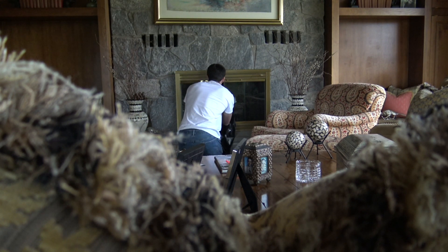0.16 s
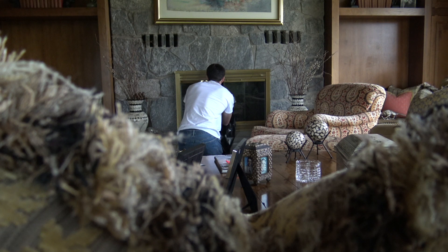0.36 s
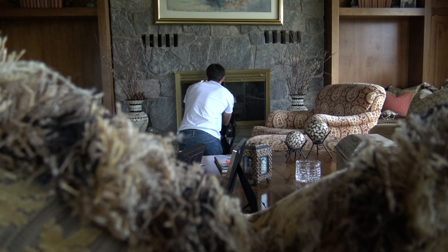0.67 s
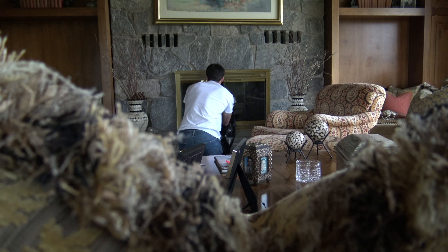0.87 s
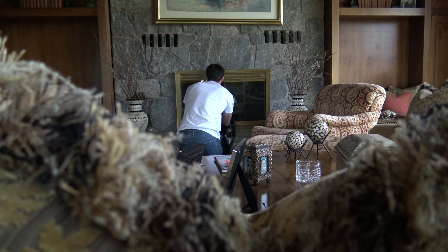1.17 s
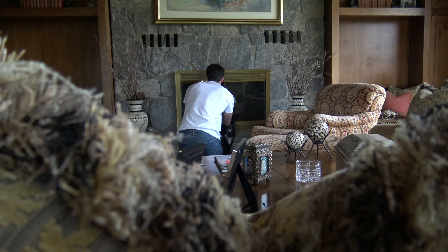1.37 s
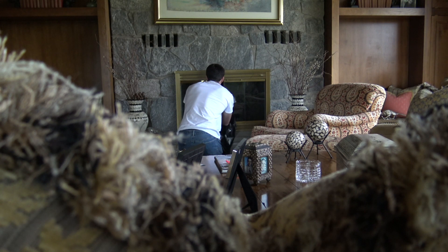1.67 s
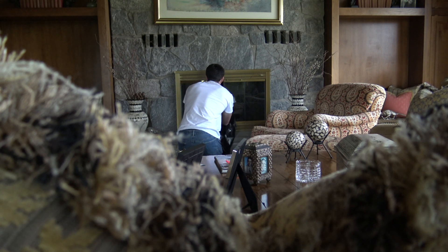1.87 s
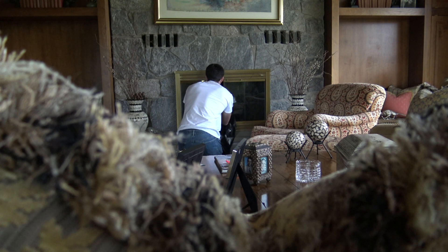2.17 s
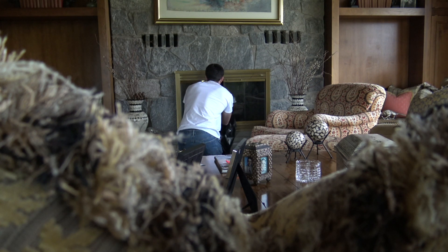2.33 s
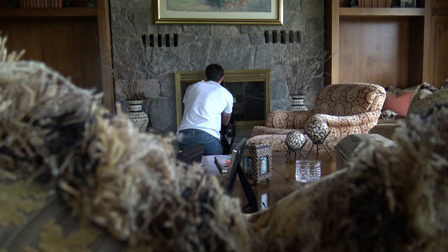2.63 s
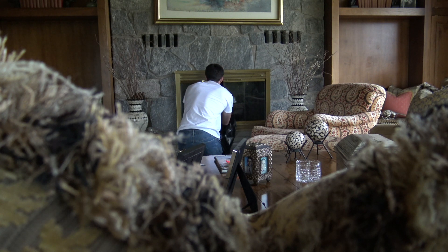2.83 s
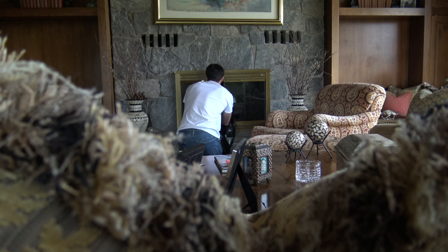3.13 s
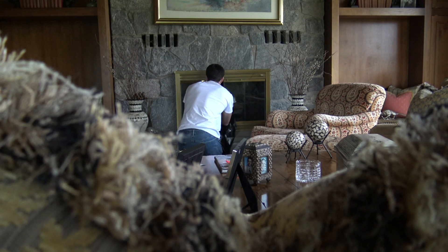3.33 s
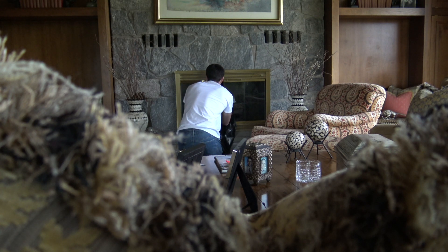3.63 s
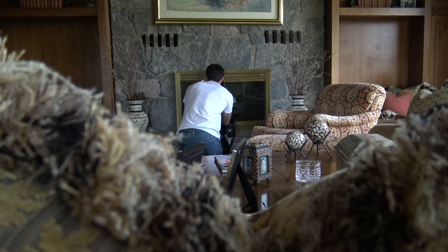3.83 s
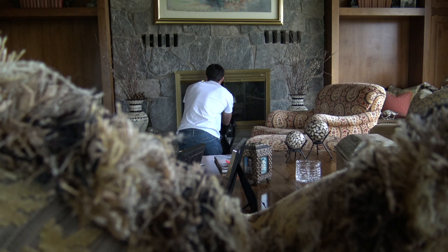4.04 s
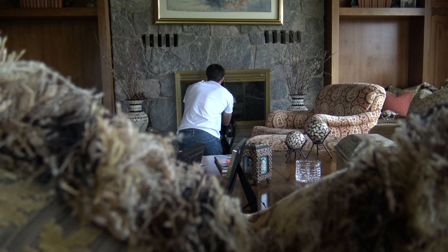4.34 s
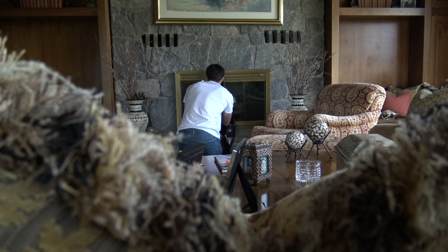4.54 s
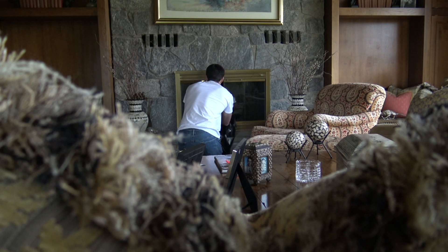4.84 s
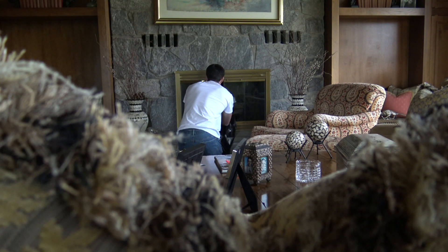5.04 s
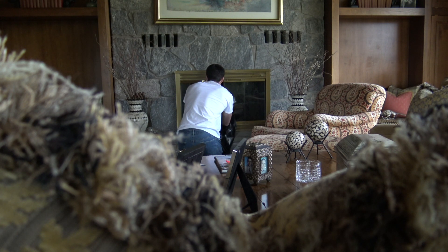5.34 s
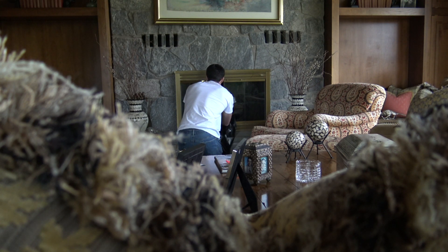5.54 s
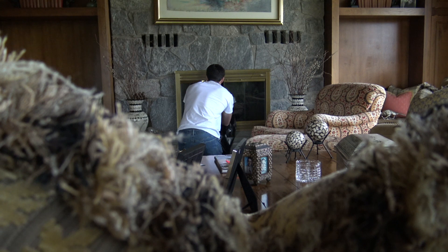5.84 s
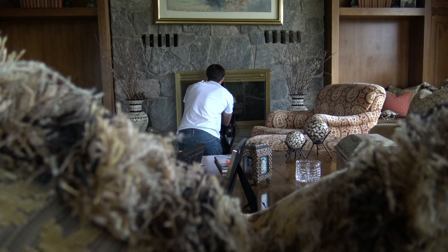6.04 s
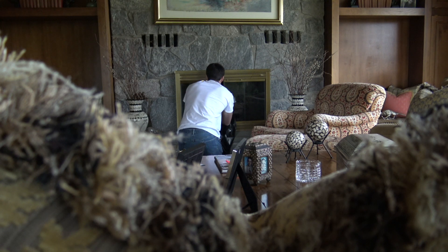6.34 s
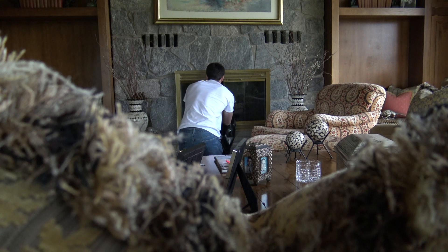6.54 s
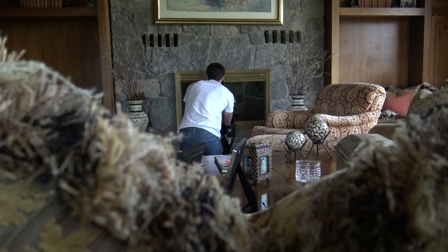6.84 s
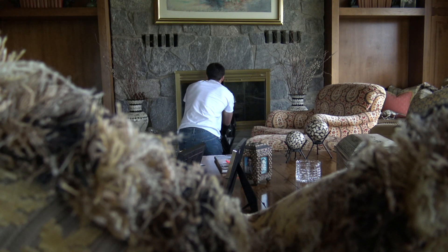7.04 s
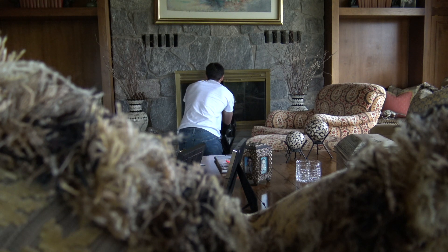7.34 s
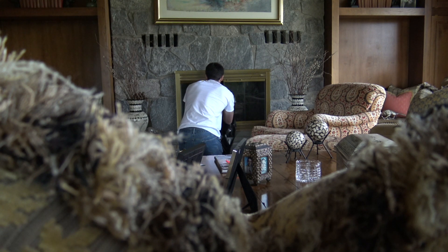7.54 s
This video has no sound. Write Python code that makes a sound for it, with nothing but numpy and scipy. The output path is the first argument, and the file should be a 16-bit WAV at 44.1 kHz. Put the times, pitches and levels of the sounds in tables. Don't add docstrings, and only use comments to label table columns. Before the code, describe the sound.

A hand shakes the metal-framed glass doors of a stone fireplace, heard from across a living room. Uneven slams, bounces and rattles fill four seconds, with hollow booms, panel clangs and sharp pane snaps. Then near silence over faint fan hum and hiss, a soft knock with a light brush past six seconds, and another small double knock near the end.

```python
import sys
import numpy as np
from scipy import signal
from scipy.fft import rfft, irfft, next_fast_len
from scipy.io import wavfile
from scipy.ndimage import uniform_filter1d

SR = 44100
rng = np.random.default_rng(int(sys.argv[2]) if len(sys.argv) > 2 else 0)


def voltage_ratio(decibels):
    exponent = np.asarray(decibels, float) / 20
    return 10 ** exponent


def digitize_waveform(pressure):
    field = np.atleast_2d(pressure).T
    bounded = np.clip(field, -1, 1)
    quanta = np.round(bounded * 32767).astype(np.int16)
    wavfile.write(sys.argv[1], SR, quanta)


N = 339570
STEP = 15


def unit(x):
    return x / np.sqrt(np.mean(x ** 2) + 1e-20)


def along(points, hz):
    f, value = np.transpose(points)
    return np.interp(np.log(hz + 1), np.log(f + 1), value)


def filtered(x, response):
    m = 2 * next_fast_len(N // 2 + SR // 4)
    return irfft(rfft(x, m) * response(np.fft.rfftfreq(m, 1 / SR)), m)[..., :N]


def causal(gain):
    cepstrum = irfft(np.log(np.maximum(gain, 1e-6)))
    half = len(cepstrum) // 2
    cepstrum[1:half] *= 2
    cepstrum[half + 1:] = 0
    return np.exp(rfft(cepstrum))


# frequency in Hz, level in dB per Hz.
HUM = [(20, -8), (45, -3.5), (90, -4.5), (200, -7), (400, -12.5), (620, -20), (800, -15.5), (920, -11.5),
       (1150, -13.5), (1400, -23), (2200, -27), (6000, -28), (12000, -30.5), (15800, -33)]


def hum():
    z = signal.stft(rng.standard_normal((2, N)), nperseg=512)[2]
    patches = uniform_filter1d(rng.standard_normal(z.shape[1:]), size=4, axis=0)
    patches = uniform_filter1d(patches, size=10, axis=1)
    z = z * voltage_ratio(1.2 * unit(patches))
    pair = signal.istft(z, nperseg=512)[1][:, :N]
    return voltage_ratio(-57.5) * unit(filtered(pair, lambda hz: voltage_ratio(along(HUM, hz))))


# start in seconds, strength in dB, extra weight in dB, extra hardness in dB, pane snap pitch in Hz.
SLAMS = [(0.181, -25, .3, -7, 1680), (0.433, -21, -5, -2.5, 2080), (1.2143, -27, -2.5, 3.5, 2080),
         (1.4828, -22, .3, -1.5, 2960), (1.705, -29, 3, -3.5, 2850), (1.9164, -28, .3, 6.5, 1420),
         (2.248, -36, 3.5, -1.5, 3300), (2.9526, -28, .3, -.3, 3390), (3.1625, -28, 5, 6, 1430),
         (3.3795, -23, 3, .3, 3070), (3.5976, -22, -1.5, .3, 2020), (3.817, -24, 4.5, .7, 3380),
         (4.03, -30, 5.5, -1.5, 3400), (6.321, -42, 3, .3, 3200), (7.3025, -33.5, -.3, -14, 1460),
         (7.3965, -41, 5, -.7, 1540)]
# start in seconds, strength in dB, extra weight in dB, extra hardness in dB if any.
PUSHES = [
    (0.161, -35, 8),
    (0.415, -27, 2.5),
    (1.465, -30, 5),
    (1.695, -24, -9, -4),
    (2.93, -45, 9),
    (3.149, -21.5, -6, -4),
    (3.58, -28, 5),
    (4.02, -28, 4, 10.5),
]
# start in seconds, strength in dB, extra weight in dB, extra hardness in dB.
REBOUNDS = [
    (0.46, -27, -2.5, .3),
    (1.245, -24, -1.5, .3),
    (1.515, -31, -.3, 4),
    (1.94, -23.5, 1.5, -5),
    (2.98, -36, 6, .3),
    (3.62, -33, 8, 4),
    (6.35, -48, 8, 2.5),
    (1.74, -31, 4, .3),
]
# start in seconds, strength in dB, extra weight in dB, extra hardness in dB.
SWINGS = [(-0.04, -29, .3, -.3), (0.7, -47, 2.5, -5), (2.05, -35, -15, -19), (2.36, -46, 5, -6),
          (3.1, -32, -4, -6), (3.3, -32, .3, 3), (3.48, -36, -9, 3), (3.745, -35, 2.5, 2.5),
          (3.93, -34, .7, 2.5), (4.08, -39, -15, -19), (4.31, -52, 1.5, -.3), (4.52, -56, 8, -9),
          (6.41, -53, 4, 5), (7.44, -49, 5, 4)]
# start in seconds, strength in dB, extra weight and extra hardness in dB if any.
BAR_RATTLES = [
    (0.315, -30, -2.5, 2.5),
    (0.59, -36.5, -6, -4),
    (1.35, -37),
    (1.39, -33),
    (1.6, -28),
    (1.62, -33),
    (1.84, -30, -.3, 4),
]
# start in seconds, strength in dB.
BRUSHES = [
    (1.165, -67),
    (1.19, -69),
    (2.885, -67),
    (6.22, -74),
    (6.27, -72),
    (6.48, -64),
    (7.6, -70),
]
# frame, panel, pane, firebox, thump, hollow, bar and glass, all in dB.
SLAM_WAKES = (-8, -8.3, -11, -10.3, -4, -.4, -8, -7.5)
PUSH_WAKES = (-25, -15.5, -25, -9, -11, -.1, -23, -28)
REBOUND_WAKES = (-10.5, -11, -12, -10.5, -3, -.1, -10.5, -16)
SWING_WAKES = (-15, -14, -17, -6.5, -1.5, -.1, -21, -25)
RATTLE_WAKES = (-18, -16, -19.5, -10.5, -5, .6, -6, -20.5)
BRUSH_WAKES = (-4, -3, 1.5, 9, .1, -2.5, -19, -16)
FEELS_WEIGHT = (0, 0, 0, 1, 1, 0, 0, 0)
FEELS_HARDNESS = (1, .55, .95, 0, 0, 0, .7, .95)
FEELS_FORCE = (0, -.04, .17, 0, 0, 0, 0, .3)


def contacts():
    kinds = [(SLAMS, SLAM_WAKES), (PUSHES, PUSH_WAKES), (REBOUNDS, REBOUND_WAKES), (SWINGS, SWING_WAKES),
             (BAR_RATTLES, RATTLE_WAKES), (BRUSHES, BRUSH_WAKES)]
    usual_db = -25
    times, levels = [], []
    for table, wakes in kinds:
        for row in table:
            start, db, weight, hard = (*row, 0, 0)[:4]
            touch = weight * np.array(FEELS_WEIGHT) + hard * np.array(FEELS_HARDNESS)
            force = (db - usual_db) * np.array(FEELS_FORCE)
            times.append(start)
            levels.append(db + np.array(wakes) + touch + force)
    return np.array(times), np.transpose(levels)


def chatter(count, depth_db):
    knots = rng.standard_normal((count, 1000))
    t = np.arange(SR // STEP) * STEP / SR
    return [np.interp(t * 400, np.arange(len(k)), voltage_ratio(depth_db * k)) for k in knots]


# delay in seconds, level in dB, spread in seconds.
ECHOES = [
    (.008, -3, .007),
    (.021, -4, .015),
    (.045, -6, .03),
]


def part(times, level_db, shape, chatter, response):
    db, rise, first, room, room_db = shape
    t = np.arange(SR // STEP) * STEP / SR
    returns = 1 + sum(voltage_ratio(g) * (t > d) * np.exp(-np.abs(t - d) / w) for d, g, w in ECHOES)
    start = ((1 - np.exp(-t / rise)) * returns) ** 2
    burst = voltage_ratio(-60 * t / first) ** 2
    tail = voltage_ratio(room_db) ** 2 * np.exp(-2 * np.log(1000) * t / room)
    lead = 200
    power = np.zeros(lead + N // STEP + 1 + len(t))
    for s, level, grain in zip(times, level_db, chatter):
        at = lead + round(s * SR / STEP)
        power[at:][:len(t)] += voltage_ratio(level + db) ** 2 * start * (burst * grain + tail)
    envelope = np.repeat(np.sqrt(power[lead:]), STEP)[:N]
    return filtered(envelope * rng.standard_normal((2, N)), response)


# frequency in Hz, width in Hz, level in dB over the broad colour.
MODES_OF_DOOR = [(37, 12, 9), (124, 11, 9), (215, 20, 1.5), (266, 14, 7), (346, 30, 6), (927, 16, 8),
                 (1570, 30, 4), (2686, 30, 5.5), (3016, 23, 4.5), (3233, 45, 3.5), (3384, 25, 5),
                 (4500, 110, 1.5), (5440, 150, 2.5), (6340, 40, 3)]
# frequency in Hz, level in dB per Hz.
COLOUR = [(22, -14), (60, -7), (160, -7), (300, -2), (465, -7), (600, -4), (820, -6.3), (1200, -5.3),
          (2000, -5.5), (3300, -6.5), (4500, -10), (7000, -12.5), (10500, -16.5), (15800, -31)]


def door(low_hz, high_hz, share_db=0):
    f = np.fft.rfftfreq(2 ** 15, 1 / SR)
    peaks = sum(voltage_ratio(db) ** 2 / (1 + (2 * (f - c) / w) ** 2) for c, w, db in MODES_OF_DOOR)
    edges = 1 / (1 + (low_hz / (f + 1)) ** 8) / (1 + (f / high_hz) ** 8)
    gain = unit(voltage_ratio(along(COLOUR, f)) * np.sqrt((1 + peaks) * edges))
    ring = irfft(causal(gain * voltage_ratio(share_db)))
    return lambda hz: rfft(ring, 2 * (len(hz) - 1))


def ringing(modes):
    def response(f):
        r = sum((-1) ** k * voltage_ratio(db) * 1j * f * w / (c * c - f * f + 1j * f * w)
                for k, (c, w, db) in enumerate(modes))
        return r / np.sqrt(np.mean(np.abs(r) ** 2))
    return response


def struck(times, level_db, modes, blow_db):
    blows = np.zeros(N)
    late = times > 0
    blows[np.round(times[late] * SR).astype(int)] = voltage_ratio(level_db[late] + blow_db)
    return np.array([filtered(blows, ringing(modes)), np.zeros(N)])


TAP_HZ = (1436, 2020, 2686, 3016, 3233, 3384)
SNAP_S = .008


def taps(frame_db, count):
    run_s, over_frame_db, fade_db_per_s = .09, 13, 110
    draws = rng.random((len(SLAMS), count, 3))
    out = []
    for row, db, run in zip(SLAMS, frame_db, draws):
        for late, soft, which in run:
            delay = run_s * late
            peak_db = db + over_frame_db - fade_db_per_s * delay - 8 * soft
            out.append((row[0] + SNAP_S + delay, peak_db, TAP_HZ[int(which * len(TAP_HZ))]))
    return out


# start in seconds, peak level in dB, pitch in Hz.
CLACKS = [(0.2434, -21, 1570), (0.3292, -24, 1460), (0.4364, -14, 2780), (0.4874, -12, 2240),
          (1.2491, -12, 2790), (1.2634, -10.5, 2140), (1.2874, -16, 1440), (1.4974, -8, 2080),
          (1.6227, -18, 1450), (1.8402, -22, 1450), (2.9534, -18, 3450), (3.3803, -14, 3200),
          (3.396, -7, 2020), (1.52, -16, 1440), (3.5234, -22, 3500), (3.8182, -11, 3190),
          (4.0362, -14, 1420), (7.6, -47, 6300), (7.615, -50, 6300), (6.4792, -36, 3520)]


def clacks():
    out, t = np.zeros(N + SR), np.arange(SR // 20) / SR
    frame_db = contacts()[1][0]
    slam_snaps = [(row[0] + SNAP_S, db + 22, row[-1]) for row, db in zip(SLAMS, frame_db)]
    snaps = slam_snaps + list(CLACKS) + taps(frame_db, count=6)
    draws = rng.standard_normal((len(snaps), 2))
    for (s, db, hz), spread in zip(snaps, draws):
        neighbours = sum(np.sin(2 * np.pi * hz * ratio * t) for ratio in np.exp(.25 * spread))
        ring = np.sin(2 * np.pi * hz * t) + .6 * neighbours
        crack = 1.6 * voltage_ratio(-60 * t / .01) * uniform_filter1d(rng.standard_normal(len(t)), size=4)
        snap = (ring * voltage_ratio(-60 * t / .04) + crack) * (1 - np.exp(-t / .0005))
        out[round(s * SR):][:len(t)] += voltage_ratio(db - 8.5) * snap
    return np.array([out[:N], np.zeros(N)])


# frequency in Hz, width in Hz, level in dB.
HOLLOW_MODES = [(515, 18, -1.5), (540, 16, -3.5), (575, 16, .3), (612, 18, -3), (717, 11, -5.5),
                (740, 16, -11)]
BAR_MODES = [(1436, 14, .3), (1458, 22, -5), (1530, 35, -6)]
GLASS_MODES = [(2020, 22, .3), (2060, 40, -6)]
# level in dB, rise in seconds, first t60 in seconds, room t60 in seconds, room in dB over first.
THUMP = (-1.5, .004, .15, .9, -5)
HOLLOW = (-1.9, .0015, .12, .72, -5.3)
BAR = (-2.5, .0015, .12, .72, -3.5)
GLASS = (-3.5, .0015, .12, .72, -6)


def rings():
    s, (*_, thump_db, hollow_db, bar_db, glass_db) = contacts()
    grain = chatter(count=len(s), depth_db=5)
    parts = [(thump_db, THUMP, door(210, 450)), (hollow_db, HOLLOW, ringing(HOLLOW_MODES)),
             (bar_db, BAR, ringing(BAR_MODES)), (glass_db, GLASS, ringing(GLASS_MODES))]
    shaken = sum(part(s, db, shape, grain, colour) for db, shape, colour in parts)
    hollow = struck(s, hollow_db, HOLLOW_MODES, blow_db=26)
    bar = struck(s, bar_db, BAR_MODES, blow_db=28)
    glass = struck(s, glass_db, GLASS_MODES, blow_db=25)
    return shaken + hollow + bar + glass


# level in dB, rise in seconds, first t60 in seconds, room t60 in seconds, room in dB over first.
FRAME = (-.6, .001, .15, .72, 5)
PANEL = (4, .004, .15, 0.88, .3)
PANE = (.7, .002, .15, .82, 5.5)
SIZZLE = (.9, .003, .15, .7, 6)
FIREBOX = (1.3, .022, .15, 1.2, -5.5)


def knocks():
    s, (frame_db, panel_db, pane_db, box_db, *_) = contacts()
    grain = chatter(count=len(s), depth_db=8)
    parts = [(frame_db, FRAME, door(2150, 4200)), (panel_db, PANEL, door(450, 2150)),
             (pane_db, PANE, door(4200, 9500, share_db=-.8)),
             (pane_db, SIZZLE, door(9500, 19000, share_db=-8)), (box_db, FIREBOX, door(18, 210))]
    return sum(part(s, db, shape, grain, colour) for db, shape, colour in parts)


def ports(pair, lean, apart):
    left, right = filtered(pair[0], lambda hz: voltage_ratio(np.outer([.5, -.5], along(lean, hz))))
    side = filtered(pair[1], lambda hz: voltage_ratio(along(apart, hz)))
    return np.array([left + side, right - side])


# frequency in Hz, left over right in dB.
LEAN = [(60, 0.5), (99, 0.5), (160, 2), (270, 1.0), (450, -0.5), (740, -1.5), (1220, -3), (2010, -1.5),
        (3330, -0.5), (5500, 0.0), (9080, 0.0), (15000, 0.0)]
HUM_LEAN = [(60, -0.5), (180, 2.5), (550, -0.5), (1650, -3.5), (4970, 0.0), (15000, 0.0)]
# frequency in Hz, level in dB.
APART = [(30, -27), (250, -21), (1200, -18), (2500, -28), (4000, -28), (14000, -25)]
HISS_APART = [(30, -22), (250, -16), (1000, -14), (2000, -30), (4600, -30), (5500, -7), (9000, -10.5),
              (11000, -15), (13000, -28)]


def scene():
    background = ports(hum(), HUM_LEAN, HISS_APART)
    return background + ports(knocks() + rings() + clacks(), LEAN, APART)


def roll_off(x):
    return signal.sosfilt(signal.butter(12, 16500, fs=SR, output="sos"), x)


def record(dry):
    mix = filtered(dry, lambda hz: hz < 15950)
    return roll_off(mix)


dry = scene()
out = record(dry)
digitize_waveform(out)
```